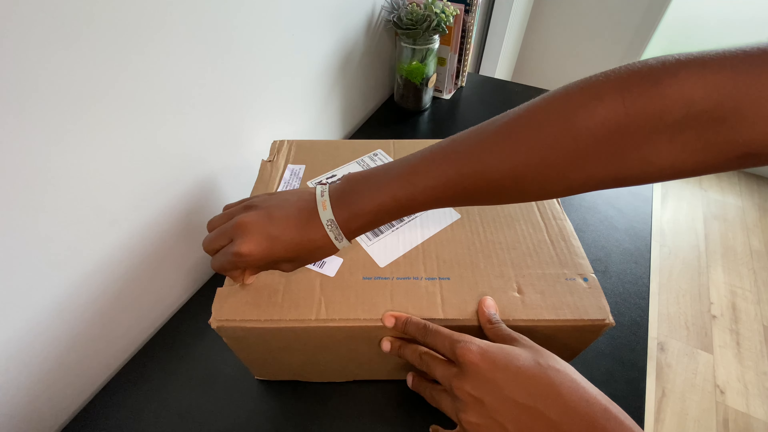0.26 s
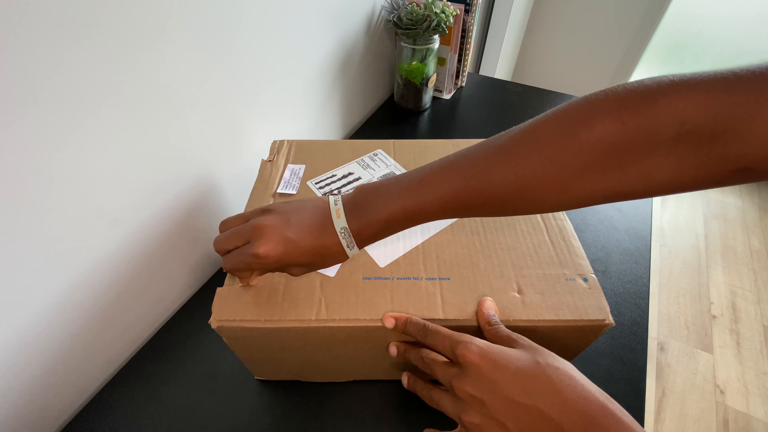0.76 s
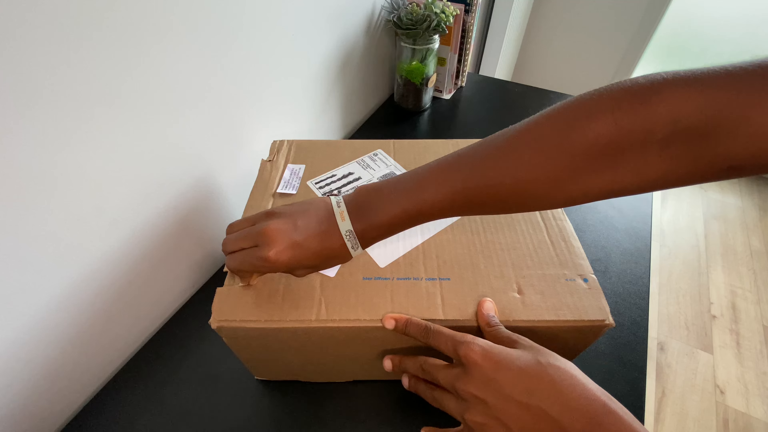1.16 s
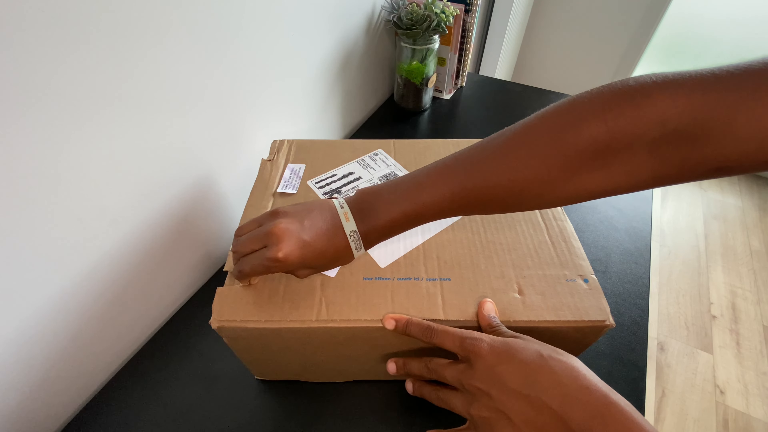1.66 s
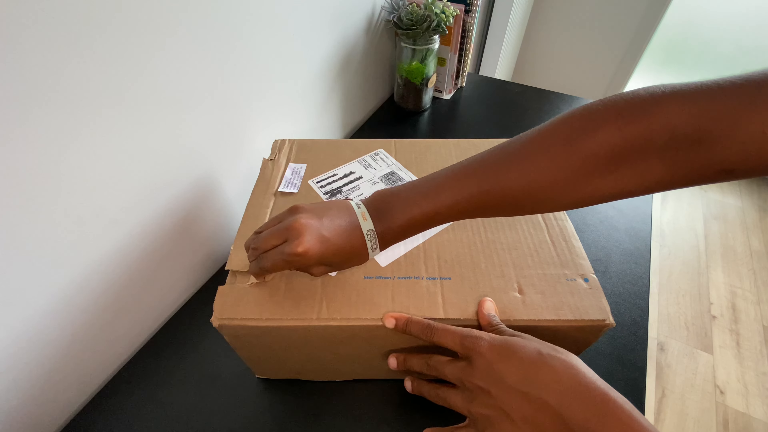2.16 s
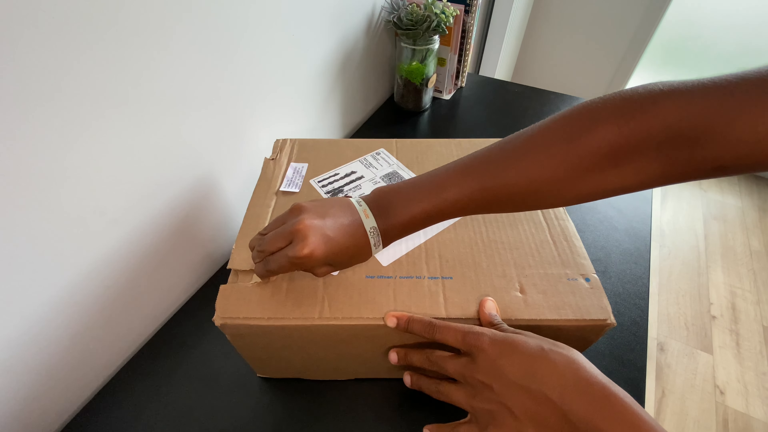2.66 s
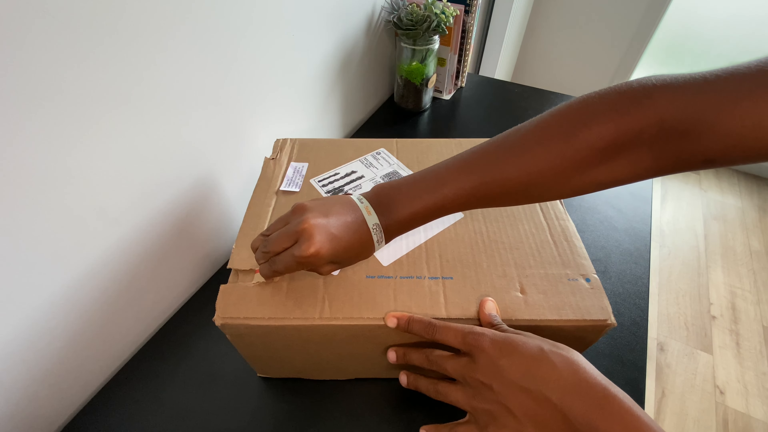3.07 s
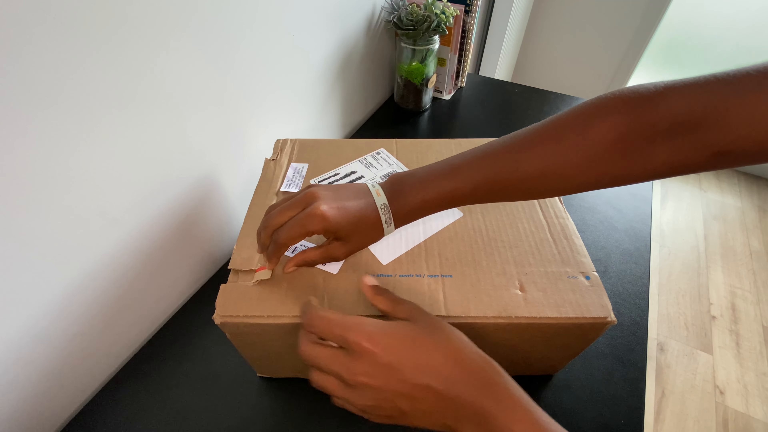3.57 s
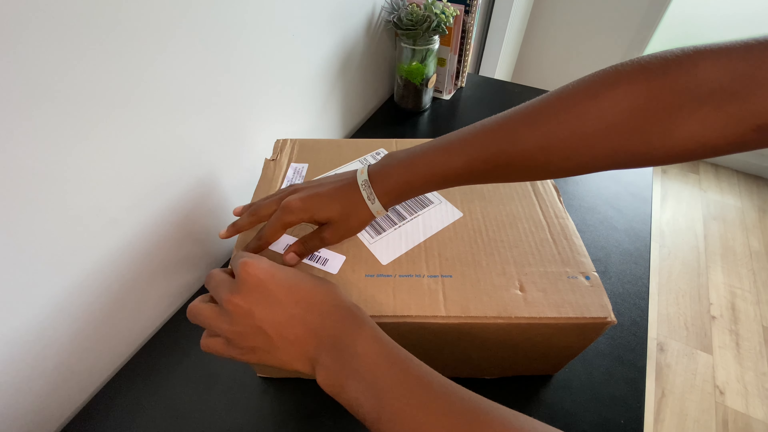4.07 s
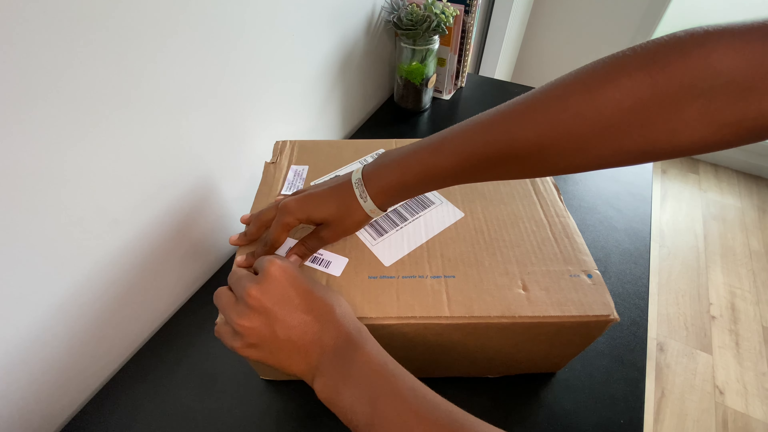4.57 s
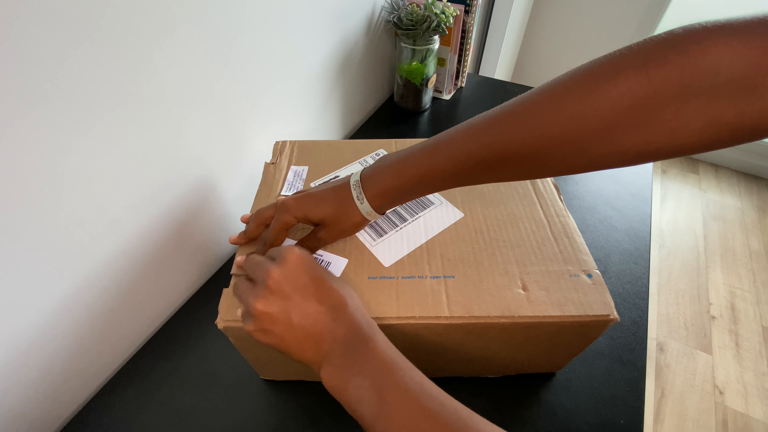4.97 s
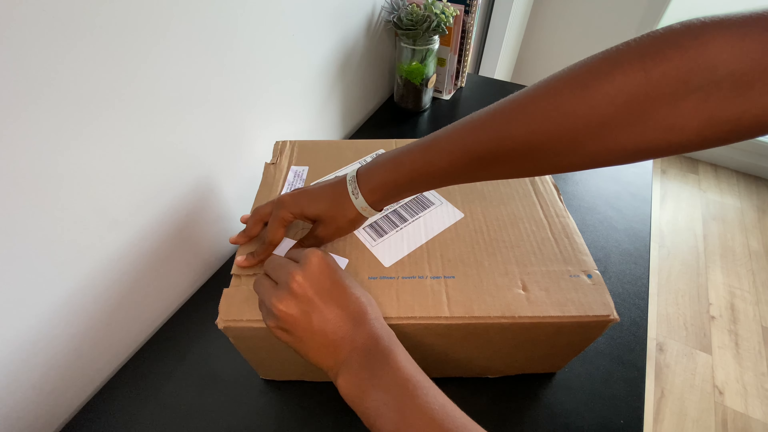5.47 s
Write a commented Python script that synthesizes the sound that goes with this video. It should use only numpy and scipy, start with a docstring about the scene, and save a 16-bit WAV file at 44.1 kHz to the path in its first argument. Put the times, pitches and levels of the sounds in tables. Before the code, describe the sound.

Hands tear the strip of a corrugated cardboard box in small dry crackles, then sharp loud rips with hollow thumps, in a quiet room.

```python
"""A desk in a quiet room: hands work at the tear strip of a corrugated cardboard box.
Fibres part in dry snaps and bursts of crackle, made of enveloped noise; scrape and rubbing lie below.
Jerks of the strip thump the hollow box through ringing modes; handling keeps it rumbling.
Late on come a faint creak of the board and a throbbing whine, both near sines.
Two close microphone ports hear the box from the side, with small-room echoes and air noise."""
import sys
import numpy as np
from scipy import signal
from scipy.fft import rfft, irfft, next_fast_len
from scipy.io import wavfile

SR = 44100
rng = np.random.default_rng(int(sys.argv[2]) if len(sys.argv) > 2 else 0)


def generate_wav(sig):
    """Save sig (samples, or channels by samples) to the path in sys.argv[1] as 16-bit PCM at SR."""
    pcm = np.round(np.clip(np.atleast_2d(sig).T, -1, 1) * 32767).astype(np.int16)
    wavfile.write(sys.argv[1], SR, pcm)


N = 252693
HZ = np.maximum(np.fft.rfftfreq(next_fast_len(N + SR // 2, real=True), 1 / SR), 1)
SIZE = 2 * (len(HZ) - 1)   # padded FFT length, samples


def from_db(db):
    """Decibels to amplitude gain."""
    return 10 ** (np.asarray(db) / 20)


def rms_one(x):
    """Scale to rms 1."""
    return x / np.sqrt(np.mean(x ** 2) + 1e-20)


def in_time(rows):
    """Curve columns after t/s, interpolated to one value per sample."""
    s, *columns = np.transpose(rows)
    return [np.interp(np.arange(N) / SR, s, column) for column in columns]


def at_hz(points):
    """Spectrum table read at every bin, linear over log frequency."""
    hz, value = np.transpose(points)
    return np.interp(np.log(HZ), np.log(np.maximum(hz, 1)), value)


def colour(x, spectrum):
    """Minimum-phase filter: white noise gets this spectrum at rms 1, with no sound ahead of its input."""
    cepstrum = irfft(np.log(rms_one(from_db(at_hz(spectrum)))), SIZE)
    cepstrum[1:SIZE // 2] *= 2   # fold onto causal half
    cepstrum[SIZE // 2:] = 0
    response = np.exp(rfft(cepstrum))
    return irfft(rfft(x, SIZE) * response, SIZE)[..., :N]


def drift(corner_hz):
    """Slow random curve, rms 1: noise through a two-pole lowpass."""
    r = np.exp(-2 * np.pi * corner_hz / SR)
    noise = rng.standard_normal(N + SR)
    settled = signal.lfilter([1], [1, -2 * r, r * r], noise)[SR:]
    return rms_one(settled)


def ring(force, hz, t60_s):
    """Two-pole resonator: a unit click starts a decaying sine of height 1."""
    r = from_db(-60 / (t60_s * SR))
    w = 2 * np.pi * hz / SR
    return signal.lfilter([0, np.sin(w)], [1, -2 * r * np.cos(w), r * r], force + 1e-18)


# air noise spectrum: (f/Hz, level/dB per Hz, relative)
AIR_SPECTRUM = [(22, -45), (36, -22), (55, 6), (87, 3), (1000, -17), (2630, -28.5), (10400, -37),
                (15000, -52)]
# left-right correlation: (f/Hz, likeness/1)
AIR_LIKENESS = [(60, 0.9), (240, 0.055), (950, 1), (15000, 0.078)]
AIR_MEAN_DB = -66.5   # ports sit 1.5 dB either side


def room_tone():
    """Steady air noise; mid and side mixed for a port likeness that varies with frequency."""
    mid, side = rfft(rng.standard_normal((2, SIZE)))
    alike = np.clip(at_hz(AIR_LIKENESS), -1, 1)
    pair = np.sqrt(1 + alike) * mid + np.sqrt(1 - alike) * side * [[1], [-1]]
    noise = irfft(pair * from_db(at_hz(AIR_SPECTRUM)), SIZE)[:, :N]
    return from_db(AIR_MEAN_DB + np.array([[1.5], [-1.5]])) * rms_one(noise)


# hands resting and shifting, before mix offsets: (t/s, rubbing level/dB, box rumble level/dB)
HANDS = [(0, -64.5, -39.5), (.18, -64.5, -78), (.42, -67.5, -59), (.58, -68.5, -57), (.9, -71, -58),
         (1.2, -66, -68), (1.68, -80, -67), (1.79, -71, -58.5), (2.16, -72, -57.5), (2.45, -70.5, -65),
         (2.77, -66, -58), (3.05, -88, -81), (3.2, -71.5, -52.5), (3.57, -66, -61.5), (3.68, -74, -56.5),
         (4.0, -75.5, -65.5), (4.12, -67, -53), (4.38, -71.5, -64.5), (4.48, -63.5, -59.5),
         (4.6, -71.5, -57), (4.69, -62, -49), (4.92, -69.5, -66), (5.1, -74, -63.5), (5.4, -105, -63),
         (5.73, -66, -49.5)]
# tugs at the strip, before mix offsets: (start of full pull t/s, hold/s, scrape level/dB,
# crackle re scrape/dB, rubbing re scrape/dB)
TUGS = [(0, 0.0022, -60.5, -1.5, -0.5), (0.142, 0.16, -70.5, -47, -11), (0.277, 0.11, -74.5, -2.5, -2),
        (0.553, 0.058, -85, 11, 10), (0.886, 0.036, -78.5, -1, -6), (1.162, 0.09, -73.5, -17, -3),
        (1.456, 0.23, -86, 4.5, 4), (1.798, 0.034, -65, 2.5, 11), (1.909, 0.029, -48, 4.5, -12),
        (1.984, 0.072, -51.5, -13, -8), (2.266, 0.13, -73, -6, 2.5), (2.514, 0.1, -67, 2.5, -26),
        (2.763, 0.03, -68, 6.5, -12), (2.929, 0.012, -67, 7.5, -6), (3.05, 0.036, -67.5, 5, -6.5),
        (3.366, 0.24, -77.5, 0, -9.5), (4.106, 0.012, -84.5, -7, 7), (4.48, 0.021, -63, -9.5, -3),
        (4.759, 0.13, -73, -9, 5), (5.012, 0.025, -53, -0.5, -16), (5.165, 0.021, -70.5, 2.5, 13),
        (5.348, 0.014, -51, 4, 0.5), (5.572, 0.021, -41, 0.5, -1), (5.721, .05, -64.5, 6, -10)]
RISE_DB_PER_S, FALL_DB_PER_S = 258.5, 218.5   # scrape and rubbing
CRACKLE_STEEPER = 1.18   # factor on both rates
SLACK_SCRAPE_DB, SLACK_CRACKLE_DB = -86.5, -99   # floor between tugs, before mix offsets
TUG_RUMBLE_DB, RUMBLE_EXPONENT = -51.5, 1   # rumble at -50 dB scrape; growth with scrape


def pull():
    """Control levels in dB: each tug rises, holds and dies, adding to hand rubbing and box strain."""
    t = np.arange(N) / SR
    rub_db, rumble_db = in_time(HANDS)
    scrape = from_db(SLACK_SCRAPE_DB)
    crackle = from_db(SLACK_CRACKLE_DB)
    rub = from_db(rub_db)
    for s, hold_s, level_db, crackle_db, tug_rub_db in TUGS:
        rise_db = RISE_DB_PER_S * np.maximum(s - t, 0)
        fall_db = FALL_DB_PER_S * np.maximum(t - s - hold_s, 0)
        fade_db = rise_db + fall_db
        tug = from_db(level_db - fade_db)
        scrape = scrape + tug
        crackle = crackle + from_db(level_db + crackle_db - CRACKLE_STEEPER * fade_db)
        rub = rub + from_db(tug_rub_db) * tug
    strain = from_db(TUG_RUMBLE_DB) * (scrape / from_db(-50)) ** RUMBLE_EXPONENT
    return 20 * np.log10([crackle, scrape, rub, from_db(rumble_db), strain])


def grains(per_s, spread_db, clump_db, grain_ms):
    """Random fibre breaks in clumps: uneven envelope of short decays, rms 1."""
    born = rng.random(N) < per_s * from_db(clump_db * drift(25)) / SR
    sizes = from_db(spread_db * np.minimum(rng.exponential(1, N), 4))
    decay = np.exp(-1000 / (grain_ms * SR))
    return rms_one(signal.lfilter([1], [1, -decay], born * sizes))


def through_flaps(x, plain):
    """Rubbing excites the upper box modes, each with unit peak gain, beside the plain sound."""
    out = plain * x
    for hz, _, t60_s in BOX_MODES[3] + BOX_MODES[4] + BOX_MODES[5]:
        out = out + ring(x, hz, t60_s) * 2 * np.log(1000) / (t60_s * SR)
    return out


PATCH_RMS_DB, PATCH_HZ = 1.5, 11


def patchy(x):
    """Third-octave bands swell and sink independently as different fibres give."""
    spectrum = rfft(x, SIZE)
    place = 3 * np.log2(np.clip(HZ, 400, 16000) / 400)
    out = 0
    for band in range(17):
        share = np.clip(1 - np.abs(place - band), 0, 1)   # overlapping triangles
        out = out + irfft(spectrum * share, SIZE)[..., :N] * from_db(PATCH_RMS_DB * drift(PATCH_HZ))
    return out


# single fibre snaps, before mix offsets: (t/s, peak level/dB, dull part re peak/dB)
SNAPS = [(0.0896, -44.5, -5), (0.547, -40, -20), (0.5944, -48, -1.5), (0.638, -47.5, -13),
         (0.8333, -42.5, -21), (0.863, -40, -16), (0.8779, -29.5, -22.5), (0.902, -51, 2.5),
         (1.075, -38, -15), (1.195, -42.5, -6.5), (1.256, -43.5, -25), (1.283, -44, -16),
         (1.3418, -45.5, -3.5), (1.3756, -43, -32), (1.3896, -35, -26.5), (1.4721, -41.5, -49),
         (1.5093, -37, -27), (1.568, -40.5, -24), (1.593, -41, -18), (1.617, -36, -22), (1.639, -44, -19),
         (1.748, -39, -36), (1.768, -36, -22), (1.9167, -33, -9), (1.957, -21.5, -2), (2.035, -47, 2),
         (2.057, -41, -19), (2.233, -40.5, -21), (2.446, -44, -30), (2.496, -32.5, -27.5),
         (2.558, -35.5, -19), (2.699, -44, -21), (2.772, -37, -17.5), (2.799, -39, -19), (2.999, -37, -32),
         (3.022, -37.5, -24), (3.122, -40.5, -14), (3.3071, -44, -4), (3.4213, -35, -8.5),
         (3.4528, -40, -9), (3.5068, -37, -6), (3.5667, -38, -10), (4.0993, -44.5, 0),
         (4.491, -38.5, -34.5), (4.6846, -42, -10.5), (4.9778, -42, -26), (4.9875, -27, -15.5),
         (4.9885, -15, -14), (5.3138, -24, -15.5), (5.3356, -16.5, -10.5), (5.36, -42, -1),
         (5.376, -38, -3), (5.392, -35, -14), (5.548, -16, -16), (5.576, -17, -12.5), (5.58, -15.5, -15.5)]
SNAP_MS, SNAP_MS_PER_DB = 1.31, 0.17   # time scale at -40 dB; growth with peak level
FOLLOW_MS, FOLLOW_LOSS_DB = 7, 14   # least delay and loss of follower; at most twice each


def snap_shapes():
    """Bright and dull envelopes: swell, fall, weak tail; a neighbour fibre ticks after each."""
    before, after = 600, 2400   # samples around the peak region
    span = before + after
    out = np.zeros((2, N + span))
    t_ms = np.arange(-before, after) / SR * 1000
    for (s, peak_db, dull_db), (late, weak) in zip(SNAPS, rng.random((len(SNAPS), 2))):
        length_ms = SNAP_MS + SNAP_MS_PER_DB * (peak_db + 40)
        u = t_ms / max(length_ms, .3) - .7
        lead = 0.12 * np.clip((peak_db + 30.5) / 25, 0, 1)   # only loud snaps have a faint lead-in of noise
        lead_in = lead * np.exp(np.minimum(u, 0) / 5.5)
        tail = np.where(u > 0, 0.067 * np.exp(-t_ms / 19.4), lead_in)
        shape = np.exp(-np.where(u > 0, u, -2.2 * u) ** 1.32) + tail
        i = round(s * SR) - before
        gains = from_db([[peak_db - 12.0], [peak_db + dull_db - 7.0]])
        out[:, i:i + span] += gains * [shape, shape + 1.5 * tail]   # dull part rustles on
        follow = np.exp(-np.abs(t_ms - FOLLOW_MS * (1 + late)) / SNAP_MS)
        out[0, i:i + span] += from_db(min(peak_db, -35) - FOLLOW_LOSS_DB * (1 + weak)) * follow
    return out[:, :N]


# crackle spectrum: (f/Hz, level/dB per Hz, relative)
CRACKLE_SPECTRUM = [(3820, -33), (6500, -16), (8160, -7.5), (10700, 2), (11600, 0), (12150, -10.5),
                    (12800, 0.5), (14300, -3.5), (15100, -7.5), (16300, -17)]
# scrape spectrum: (f/Hz, level/dB per Hz, relative)
SCRAPE_SPECTRUM = [(1180, -44), (1700, -8.5), (2600, -13.5), (3400, -8.5), (5850, -8), (8000, -12),
                   (10400, -32), (17600, -120)]
# skin and board rubbing spectrum: (f/Hz, level/dB per Hz, relative)
RUB_SPECTRUM = [(300, -26), (500, -3.5), (1000, 0), (2000, -8.5), (2800, -12), (4000, -41)]


def tearing(crackle_db, scrape_db, rub_db):
    """Noise gated by shared fibre breaks plus snaps; row 0 is the strip, row 1 from all over the lid."""
    breaks = grains(per_s=460, spread_db=-3.0, clump_db=3.5, grain_ms=2.3)
    white = rng.standard_normal((3, 2, N))
    ticks = grains(per_s=70, spread_db=3.0, clump_db=2.0, grain_ms=1.3)
    bright_snaps, dull_snaps = snap_shapes()
    # constant terms smooth the grain
    bright = from_db(crackle_db + 4.0) * (0.5 * breaks + 0.24 + 0.44 * ticks) + bright_snaps
    dull = from_db(scrape_db - 6.0) * (0.5 * breaks + 0.79) + dull_snaps
    soft = from_db(rub_db - 4.5) * (0.5 * breaks + 0.25) + from_db(-5.0) * dull_snaps
    crackle = colour(bright * white[0] * [[1], [.3]], CRACKLE_SPECTRUM)
    scrape = colour(dull * white[1] * [[1], [.6]], SCRAPE_SPECTRUM)
    rub = colour(soft * white[2] * [[1], [.55]], RUB_SPECTRUM)
    return patchy(crackle + scrape + through_flaps(rub, plain=1.0))


# jerks of the box, before mode levels: (t/s, panel push level/dB, spot/1, air cavity push level/dB)
# spot 1-5: lid panel, long sides, short sides, flaps, flap edges
JERKS = [(0.093, -44.5, 0.81, -60), (0.376, -52.5, 2.04, -68), (0.385, -53.5, 4.2, -69),
         (0.599, -54.5, 1.42, -64), (0.845, -55, 2, -83), (1.205, -51, 0.83, -81), (1.961, -27, 3.02, -43),
         (1.962, -49, 5.2, -70), (1.9, -48, 3.7, -70), (1.92, -41, 3.7, -65), (1.936, -43, 1.2, -72),
         (1.965, -21.5, 0.6, -48), (1.972, -21.5, 1.26, -44), (2.279, -55, 0.83, -88),
         (2.311, -71, 0.76, -53.5), (3.127, -55, 4.2, -62.5), (3.131, -46.5, 2.8, -55.5),
         (3.14, -50.5, 0.9, -61), (3.215, -53.5, 1.1, -83), (3.246, -51.5, 1.5, -82),
         (3.309, -54.5, 1.1, -74.5), (3.368, -62, 4, -86), (3.422, -55.5, 2, -60), (3.454, -54, 1.37, -72),
         (3.507, -37.5, 3.2, -71), (3.509, -46, 5, -80), (3.52, -45.5, 1, -81), (3.571, -60, 2.7, -70),
         (4.097, -59, 2, -61.5), (5, -27.5, 0.63, -32), (4.655, -54, 4.9, -72), (4.677, -55.5, 3.46, -76),
         (4.991, -29, 1.22, -70), (5.012, -31.5, 1.27, -49), (5.166, -54, 4.53, -52.5),
         (5.175, -49.5, 1.3, -69), (5.32, -41.5, 2.1, -45), (5.345, -25.5, 1.55, -41),
         (5.358, -27.5, 2.15, -42.5), (5.361, -35.5, 5.6, -68), (5.551, -27, 2.32, -40),
         (5.562, -34, 2, -33.5), (5.58, -24, 2.12, -34.5), (5.59, -26, 1.9, -54), (5.584, -33, 5, -66),
         (5.6, -39, 4.8, -54)]
# box modes, one list per part, cavity first, then spots 1-5: (f/Hz, level/dB, t60/s)
BOX_MODES = [
    [(73, -0.5, 0.15), (83.7, 1, 0.1)],
    [(142.5, 2, 0.086), (168.8, -10.5, 0.15), (207.5, -13.5, 0.1)],
    [(273.8, -3, 0.056), (318, -11, 0.047)],
    [(403.2, -3.5, 0.088), (512, -9.5, 0.074)],
    [(672, 0.5, 0.044), (910, -1.5, 0.018)],
    [(1171, -12.5, 0.026), (1305, -4.5, 0.036), (1656, -8.5, 0.013), (1984, -10.5, 0.013)],
]
LOSS_DB_PER_PART = 12   # panels away from the spot answer less
FLAP_CHANCE_DB = 4   # random spread of flap and edge modes per jerk


def box(rumble_db, strain_db):
    """Jerks ring each part's modes; handling and the pull on the strip keep them rumbling."""
    jerks = np.array(JERKS)
    at = np.round(jerks[:, 0] * SR).astype(int)
    handling = rng.standard_normal(N)
    out, rumble, strain = np.zeros(N), 0, 0
    for part, modes in enumerate(BOX_MODES):
        if part:
            push_db = jerks[:, 1] - LOSS_DB_PER_PART * np.abs(part - jerks[:, 2])
        else:
            push_db = jerks[:, 3]
        for hz, level_db, t60_s in modes:
            chance_db = FLAP_CHANCE_DB * (part >= 4) * rng.standard_normal(len(at))
            clicks = np.zeros(N)
            clicks[at] = from_db(push_db + level_db - 1.5 + chance_db)
            # push itself rings briefly: a panel takes a few cycles to swing up
            swing = ring(clicks, hz, 7.05 / hz) * 2 * np.pi * hz / SR
            out += ring(swing, hz, t60_s) * (-1) ** part   # neighbouring parts in antiphase
            hum = ring(handling, hz, t60_s) * from_db(level_db)
            rumble = rumble + hum * from_db(-4.0 * abs(part - .6))   # cavity and lid answer the hands
            strain = strain + hum * from_db(-4.0 * abs(part - 1.4))   # lid and sides answer the strip
    out += from_db(rumble_db - 4.0) * rms_one(rumble)
    out += from_db(strain_db) * rms_one(strain)
    return signal.sosfilt(signal.butter(4, 45, "high", fs=SR, output="sos"), out)


THROB_HZ = 30.6


def near_sine(rows, throb_depth):
    """Sine with wavering pitch and faded ends; any throb sets in after an even start."""
    hz, level_db = in_time(rows)
    t = np.arange(N) / SR - rows[0][0]
    length_s = rows[-1][0] - rows[0][0]
    gate = np.clip(np.minimum(t, length_s - t) / 0.023, 0, 1)
    onset = np.clip((t - .08) / 0.05, 0, 1)
    throb = 1 + throb_depth * onset * np.sin(2 * np.pi * THROB_HZ * t + 3.6)
    hz = hz + 14 * drift(20.5)
    return from_db(level_db) * gate * throb * np.sin(2 * np.pi * np.cumsum(hz) / SR)


# board creak, before pan: (t/s, f/Hz, level/dB)
CREAK = [(4.18, 930, -82.5), (4.28, 940, -72), (4.42, 960, -80)]


def creak():
    """Faint creak of the board: near sine without throb."""
    return near_sine(CREAK, throb_depth=0)


# throbbing whine, before throb and pan: (t/s, f/Hz, level/dB)
WHINE = [(5.09, 1205, -73), (5.165, 1190, -62.5), (5.24, 1170, -66.5), (5.34, 1150, -70)]


def whine():
    """Faint whine: near sine under amplitude modulation."""
    return near_sine(WHINE, throb_depth=0.7)


ROOM_BASS_T60_S, WALL_CUT_HZ, ROOM_DB = 0.21, 4400, -8.5


def room():
    """Response of twelve feedback delays a side, duller on every round."""
    dull = 1 / (1 + 1j * HZ / WALL_CUT_HZ)
    out = np.zeros((2, len(HZ)), complex)
    for k, lag_s in enumerate(rng.uniform(.012, .045, 24)):
        loop = from_db(-60 * lag_s / ROOM_BASS_T60_S) * dull * np.exp(-2j * np.pi * HZ * lag_s)
        out[k % 2] += loop / (1 - loop) * (-1) ** (k // 2)
    return out / np.sqrt(1 + (550 / HZ) ** 4)   # small room returns little bass


# port level difference: (f/Hz, left minus right level/dB)
PORT_DB = [(140, 5.5), (460, 1), (900, 5), (2600, 5), (4700, 11.5), (6500, 13.5), (8400, 2), (11000, -.5)]
# port phase difference: (f/Hz, left lag/rad)
PORT_LAG = [(0, 0.5), (280, 0.53), (450, 1), (700, 1.91), (1100, 3.9), (2150, 4.48), (4500, 7.7),
            (5900, 8.5), (8870, 11.69), (16100, 21.16)]


def ports():
    """Level and phase differences between the two ports, split evenly."""
    lag_rad = np.interp(HZ, *np.transpose(PORT_LAG))
    half = from_db(at_hz(PORT_DB) / 2) * np.exp(-.5j * lag_rad)
    return np.array([half, 1 / half])


TONE_PAN_DB = 8.5   # left minus right


def scene():
    """Box and strip in the room; the lid's spread-out part differs between the ports."""
    air = room_tone()
    crackle_db, scrape_db, rub_db, rumble_db, strain_db = pull()
    strip, lid = tearing(crackle_db, scrape_db, rub_db)
    near = rfft(strip + box(rumble_db, strain_db), SIZE)
    direct = ports() * (near + rfft(lid, SIZE) * [[1], [-1]])
    echoes = from_db(ROOM_DB) * np.abs(ports()) * room() * near
    tones = (creak() + whine()) * from_db([[TONE_PAN_DB / 2], [-TONE_PAN_DB / 2]])
    return irfft(direct + echoes, SIZE)[:, :N] + air + tones


CUTOFF_HZ = 16500


def record(dry):
    """Steep lowpass on the top."""
    return signal.sosfilt(signal.cheby2(16, 70, CUTOFF_HZ, fs=SR, output="sos"), dry)


dry = scene()
out = record(dry)
generate_wav(out)
```